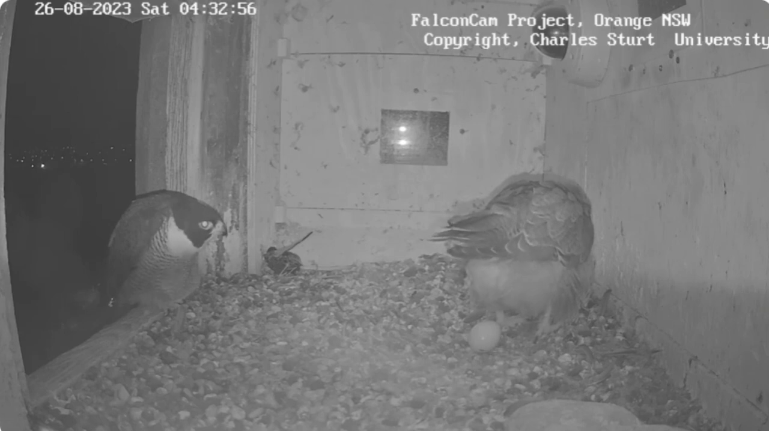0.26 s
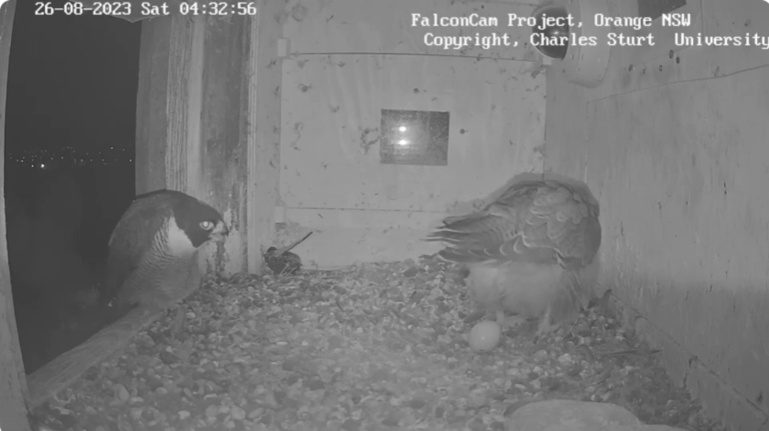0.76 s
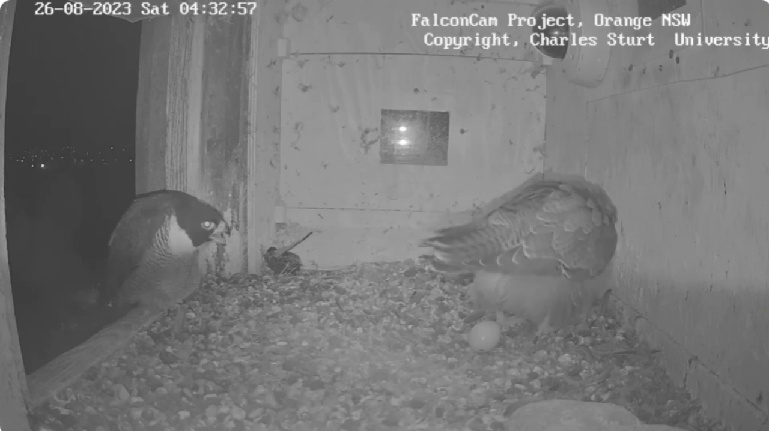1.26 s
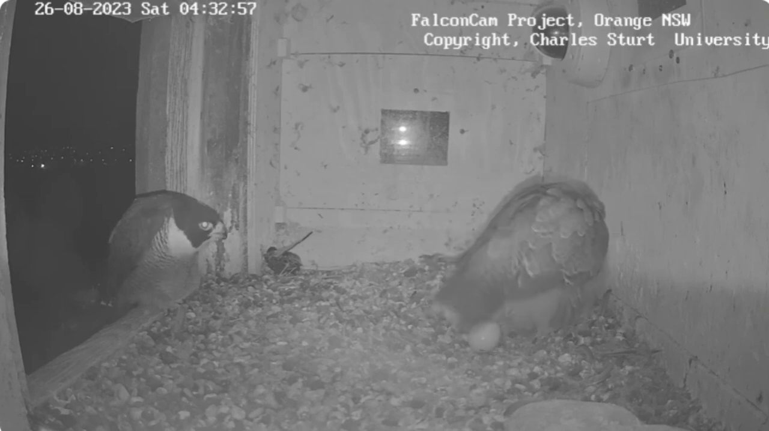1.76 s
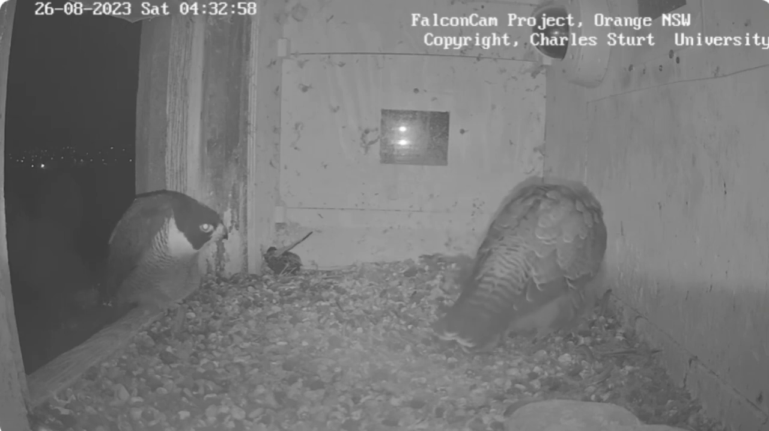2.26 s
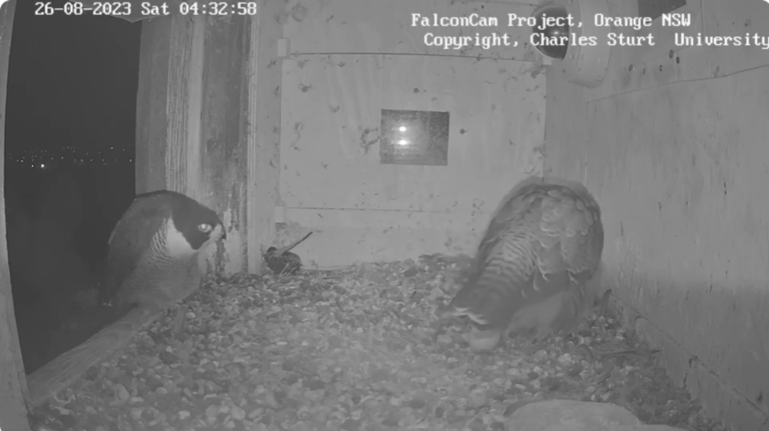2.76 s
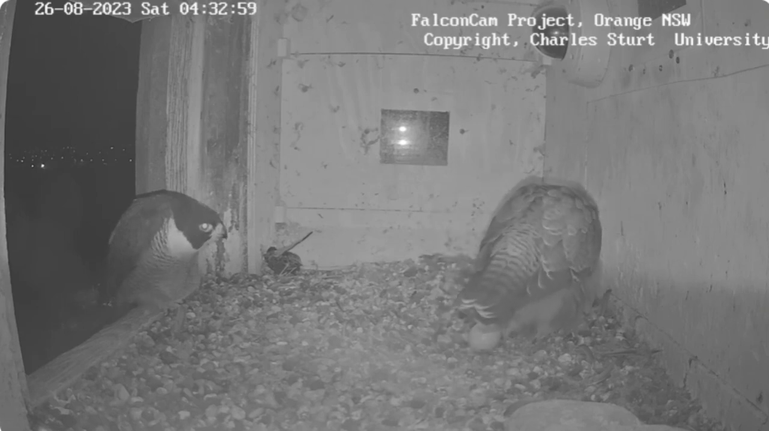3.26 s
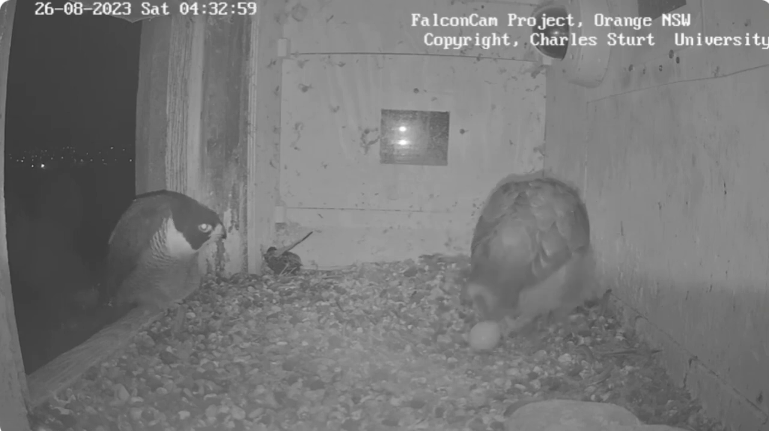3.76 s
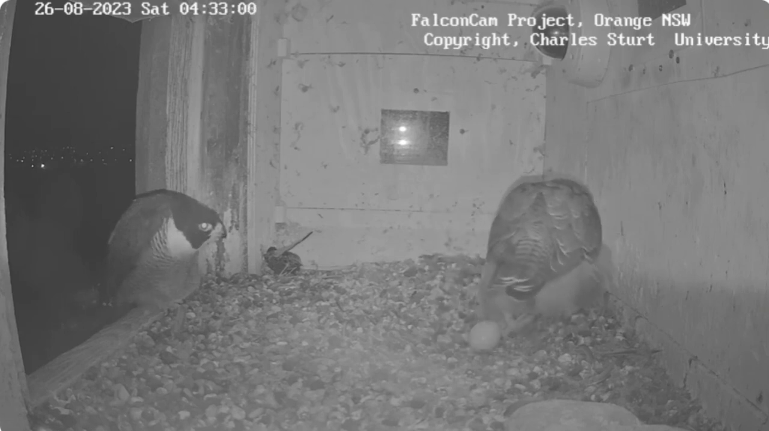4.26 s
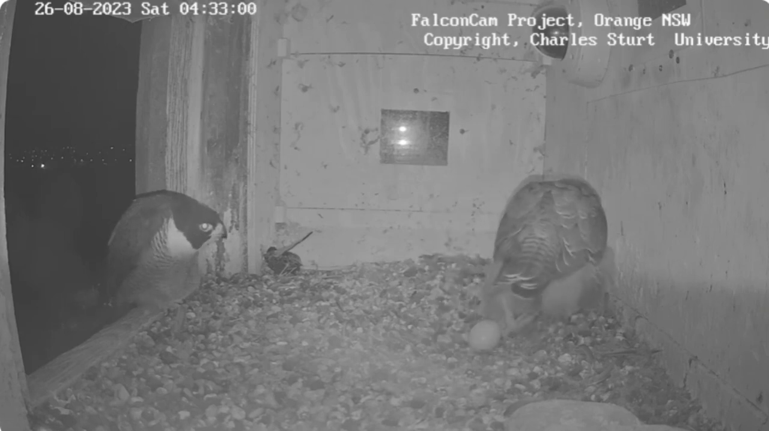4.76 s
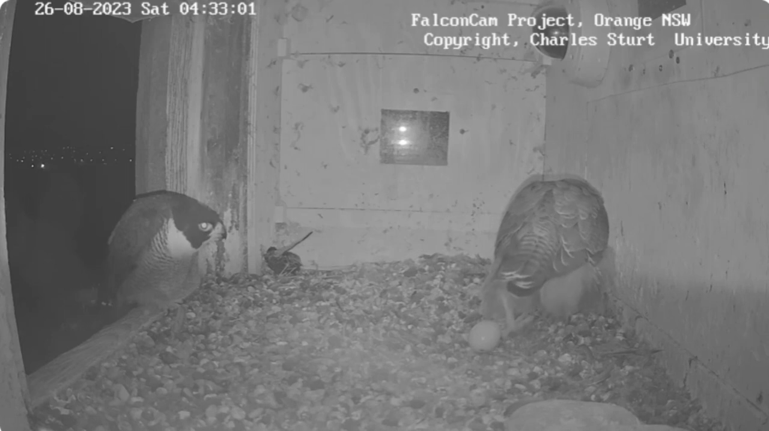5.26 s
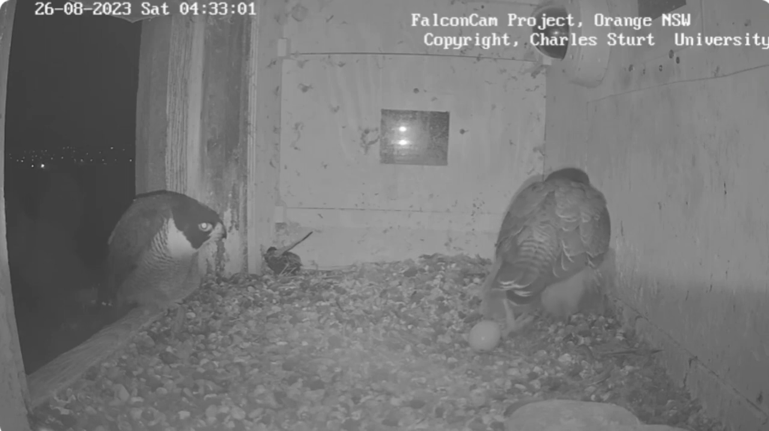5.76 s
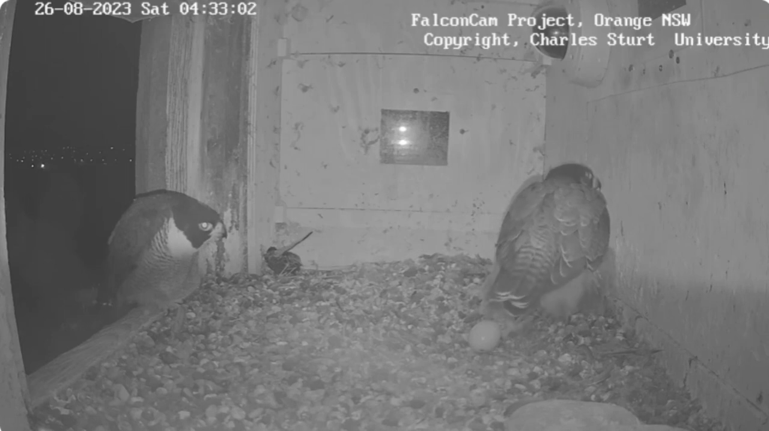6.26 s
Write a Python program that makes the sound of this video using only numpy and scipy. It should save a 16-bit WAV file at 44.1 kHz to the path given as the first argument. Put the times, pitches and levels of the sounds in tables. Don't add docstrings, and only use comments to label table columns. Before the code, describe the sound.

A falcon in a hollow, ringing nest box gives thin rising whistles snapping into chips, with throaty clucks and one hoarse answering call over low hum.

```python
import sys
import numpy as np
from scipy import signal
from scipy.fft import rfft, irfft
from scipy.io import wavfile

SR = 44100
rng = np.random.default_rng(int(sys.argv[2]) if len(sys.argv) > 2 else 0)


def convert_level_to_amplitude(level_db):
    exponent = np.asarray(level_db, float) / 20
    return 10 ** exponent


def wav_out(sig):
    wavfile.write(sys.argv[1], SR, np.round(np.clip(np.atleast_2d(sig).T, -1, 1) * 32767).astype(np.int16))


N = 287532
LEAD_IN = SR // 2

# pitch_hz, level_db
MAINS = [(50, -53.3), (100, -79), (150, -81), (200, -80), (300, -83)]
# freq_hz, density_db_per_hz
HISS = [(47, -27), (80, -1.5), (133, -4.5), (173, -6), (236, -6), (374, -15.5), (510, -9), (741, -19),
        (904, -18), (2600, -25.5), (2780, -21.5), (3110, -25), (15500, -32.5)]
HISS_DB, RUMBLE_DB = -67, -67
# time_s, level_db
WHINE = [(0, -97), (3.6, -93), (4.35, -81), (5, -86), (5.5, -82), (5.8, -91), (6.5, -90)]
WHINE_HZ = 2869
# start_s, scratch_db, thud_over_scratch_db, dullness_0_1
TICKS = [
    (.301, -52, -20, .1),
    (2.787, -68, 11, .87),
    (4.2, -68, 10, .87),
    (5.452, -48.5, -5, .9),
]
# time_s, level_db, pitch_hz
CROON = [(.085, -66, 281), (.135, -47.5, 276), (.225, -64, 268), (.305, -49, 287), (.37, -56, 282),
         (.62, -55, 277), (.682, -69, 275), (.72, -57, 284), (.95, -66, 283)]
CROON_FLUTTER_DB, CROON_RASP_DB = 2.8, -11
# start_s, pulse_rate_hz, level_db, mouth_factor, brightness_db
CLUCKS = [
    (.064, 1652, -55.5, 1.69, 1),
    (0.078, 275.3, -52, 0.602, -25.5),
    (0.761, 338.2, -48.5, 1.08, -6),
    (1.196, 365, -46.5, 1.09, -12),
    (2.021, 366.4, -45.5, 1.1, -4),
    (2.832, 454.7, -39.5, 0.89, -1.5),
    (3.409, 400, -76, 0.95, -19),
    (4.55, 366, -49.5, 1.26, -3),
    (6.365, 307.7, -59.5, 0.95, -8),
]
CLUCK_SNAPS, SHORTEST_S = 7.4, .016
# freq_hz, width_hz, level_db
GAPE = [(978.6, 850, -4.5), (1462, 530, 0), (2216, 460, -8)]
# freq_hz, level_db
THROAT_ANSWER = [(1300, -26), (2700, -0.5), (4100, 1.5), (5400, -4), (6700, -12), (8000, -24), (9400, -22),
                 (10800, -32), (13500, -43)]
# freq_hz, width_hz, level_db
BREATH_ANSWER = [(629.6, 960, -2.5), (1680, 520, 2), (2300, 540, 7), (3420, 1200, -13), (4810, 940, 2)]
# time_s, pitch_hz, effort_db, even_partials_db, odd_partials_db
ANSWER = [
    (2.853, 1336, -42, -19, -10),
    (2.858, 1364, -38.5, -15.5, -7),
    (2.872, 1340, -40, -29, -12),
    (2.882, 1356, -36.5, -1.5, -4.5),
    (2.891, 1266, -36.5, 3, -30),
    (2.897, 1345, -50, 9.5, -8.5),
    (2.914, 1405, -52.5, 10, 9),
    (2.924, 1380, -69, -0.5, -5),
]
# time_s, pitch_hz, level_db
UNDERTONE = [(2.853, 1250, -53), (2.859, 1240, -44), (2.872, 1222, -42.5), (2.881, 1200, -43),
             (2.887, 1130, -58.5)]
# start_s, length_s, pitch_hz, level_db, octave_db
PEEPS = [(1.95, .018, 5410, -76, -6), (1.966, .02, 5420, -78, 11), (3.352, .022, 5460, -76, 5),
         (4.5, .03, 5420, -73, -8), (6.311, .013, 5410, -73, -16)]
# freq_hz, level_db
THROAT = [(900, -10.5), (1200, 6), (2100, -4), (3200, -5.5), (4300, -0.5), (5300, -7.5), (6400, -5.5),
          (7000, -9.5), (7500, -20), (8300, -9.5), (9000, -12.5), (10800, -24.5), (13500, -22)]
# freq_hz, width_hz, level_db
BREATH = [(1250, 390, 0), (2411, 92, 15.5), (3240, 170, -19), (5500, 240, -12.5)]
# start_s, top_pitch_hz, effort_db, even_partials_db, effort_change_before_break_db
WHISTLES = [
    (-.15, 1088, -46.5, -18, -11),
    (.697, 1093, -49, -19, -2.5),
    (1.145, 1113, -52.5, -32, 5.5),
    (1.954, 1131, -50, -10, 5),
    (3.343, 1115, -49, -12.5, 2.3),
    (4.494, 1141, -49.5, -14, 4),
    (6.321, 1065, -52.5, -30, -3),
]
# break_s, first_pitch_hz, last_pitch_hz, effort_db, odd_partials_db
CHIPS = [
    (-.1, 1299, 972, -46.5, -12),
    (.746, 1119, 964, -46, -16.5),
    (1.18, 1149, 1012, -44.5, -7),
    (2.004, 1153, 1014, -44, -13.5),
    (3.397, 1093, 991, -48, -2),
    (4.54, 1077, 1017, -50, 5.5),
    (6.357, 1057, 969, -49.5, -1),
]
WHISTLE_FROM, WHISTLE_BEND = .88, 1.833
CATCH_AT, FULL_AT = .15, .6
ONSET_DB, CATCH_DB = .5, -6.5
WHISTLE_ODD_DB = -33
BREAK_S, CHIP_S, CHIP_SAG_S, RELEASE_S = .00407, .018, .01, .0053
CHIP_MID_DB, CHIP_END_DB, RELEASE_DB = -1.5, -2.5, -6.5
CHIP_EVEN_DB, CHIP_EVEN_END_DB, CHIP_ODD_END_DB = .6, 7.5, -5.5
ROUGH = dict(jitter=.008, shimmer_db=3, rasp=.33)
# freq_hz, t60_s
TOWER = [(250, 3.4), (500, 3.72), (1050, 2.22), (1500, 2.01), (2000, 1.76), (4000, 1.165), (6500, 0.911),
         (9000, 0.53), (13000, 0.21)]
# freq_hz, level_db
TOWER_COLOUR = [(250, 8.5), (700, -4.5), (1500, -4.5), (2200, 3.5), (4500, 1), (9000, 0.5), (13000, -0.5)]
BOX_DB, BOX_T60_S, WALL_HZ = -3, .07, 10000
# freq_hz, level_db
BALANCE_DB = [(60, 0.0), (92, 0.0), (140, 0.0), (210, 0.0), (330, 0.0), (500, 0.5), (770, 3.0), (1170, 4.0),
              (1790, 2.0), (2740, 0.5), (4190, 0.0), (6410, 0.0), (9810, 0.0), (15000, 0.0)]
# freq_hz, phase_rad
LEAD = [(150, 0), (330, .08), (700, .28), (1200, .15), (2400, -.28), (4800, -.08), (9000, -.06)]
EDGE_HZ, CHANNEL_NOISE_DB = 15720, -93


def evened(x):
    return x / np.sqrt(np.mean(x ** 2) + 1e-20)


def read(points, hz):
    f, value = np.transpose(points)
    return np.interp(np.log(hz + 1), np.log(f + 1), value)


def unroll(rows):
    s, *columns = np.transpose(rows)
    times = np.arange(s[0], s[-1], 1 / SR)
    return s[0], [np.interp(times, s, column) for column in columns]


def add(track, s, sound):
    part = track[LEAD_IN + round(s * SR):][:len(sound)]
    part += sound[:len(part)]


def wobble(count, span):
    return evened(signal.fftconvolve(rng.standard_normal(count), np.hanning(2 * int(span)), "same"))


def dull(x, hz):
    return signal.sosfilt(signal.butter(4, hz, fs=SR, output="sos"), x)


def resonate(x, modes, factor=1):
    out = np.zeros(len(x))
    for k, (hz, width_hz, db) in enumerate(modes):
        b, a = signal.iirpeak(hz * factor, hz * factor / width_hz, SR)
        twice = signal.lfilter(b, a, signal.lfilter(b, a, x))
        out += (-1) ** k * convert_level_to_amplitude(db) * twice
    return out


def tone(s, hz, db, overtones_db):
    turns = np.cumsum(hz * (1 + .0063 * wobble(len(hz), 200))) / SR
    voice = sum(convert_level_to_amplitude(o) * np.sin(2 * np.pi * (k + 1) * turns) for k, o in enumerate(overtones_db))
    return s, np.sqrt(2) * convert_level_to_amplitude(db) * voice * signal.windows.tukey(len(hz), .04)


def hum():
    t, hz = np.arange(N) / SR, np.fft.rfftfreq(N, 1 / SR)
    lines = sum(np.sqrt(2) * convert_level_to_amplitude(db) * np.sin(2 * np.pi * (f * t + rng.random())) for f, db in MAINS)
    hiss = evened(irfft(rfft(rng.standard_normal(N)) * convert_level_to_amplitude(read(HISS, hz)), N))
    rumble = evened(resonate(rng.standard_normal(N), [(57, 14, -3), (30.2, 20, -10)]))
    return lines * convert_level_to_amplitude(.6 * wobble(N, 4000)) + convert_level_to_amplitude(HISS_DB) * hiss + convert_level_to_amplitude(RUMBLE_DB) * rumble


def whine():
    s, (db,) = unroll(WHINE)
    return s, np.sqrt(2) * convert_level_to_amplitude(db) * np.sin(2 * np.pi * WHINE_HZ * np.arange(len(db)) / SR)


def tick(s, db, thud_db, dullness):
    t = np.arange(1500) / SR
    scratch = signal.lfilter([.3], [1, -dullness], rng.standard_normal(len(t))) * np.exp(-t / .004)
    thud = np.sin(2 * np.pi * 110 * t) * np.exp(-t / .017)
    return s, convert_level_to_amplitude(db) * (scratch + convert_level_to_amplitude(thud_db) * thud)


def croon():
    s, (db, hz) = unroll(CROON)
    _, voice = tone(s, hz, db + CROON_FLUTTER_DB * wobble(len(hz), 520), [0, -30])
    rasp = evened(resonate(rng.standard_normal(len(hz)), [(285, 58, -4), (177, 55, -8)]))
    return s, voice + convert_level_to_amplitude(db + CROON_RASP_DB) * rasp


def cluck(s, hz, db, mouth, bright_db):
    count = round(max(CLUCK_SNAPS / hz, SHORTEST_S) * SR)
    turns = np.cumsum(hz * (np.linspace(.8, 1.19, count) + .18 * wobble(count, 60))) / SR
    snaps = np.diff(np.floor(turns - 1e-3), prepend=-1) * convert_level_to_amplitude(2.76 * rng.standard_normal(count))
    snaps += .014 * rng.standard_normal(count)
    drive = np.pad(snaps * signal.windows.tukey(count, .45), (0, 300))
    sound = resonate(drive, [(.93 * hz, 230, -8), (1.68 * hz, 330, -8)])
    sound += resonate(drive, GAPE, mouth)
    sound += convert_level_to_amplitude(bright_db) * resonate(drive, [(3190, 490, -3.5), (4890, 1000, -18.5)])
    return s, convert_level_to_amplitude(db) * evened(dull(sound, WALL_HZ))


def undertone():
    s, (hz, db) = unroll(UNDERTONE)
    return tone(s, hz, db, [0, -16, -12])


def peep(s, length_s, hz, db, octave_db):
    swell = signal.windows.tukey(round(length_s * SR), .5)
    s, sound = tone(s, np.full(len(swell), hz), db, [0, octave_db])
    return s, sound * swell


def phrase(whistle, chip):
    start_s, top_hz, effort_db, even_db, brink_db = whistle
    break_s, first_hz, last_hz, chip_db, odd_db = chip
    share = np.array([0, CATCH_AT, FULL_AT, 1])
    after_s = np.array([0, CHIP_S / 2, CHIP_S, CHIP_S + RELEASE_S])
    s = np.r_[start_s + share * (break_s - BREAK_S - start_s), break_s + after_s]
    rise_hz = top_hz * (1 - (1 - WHISTLE_FROM) * (1 - share) ** WHISTLE_BEND)
    sag = np.exp(-after_s / CHIP_SAG_S)
    fall_hz = last_hz + (first_hz - last_hz) * (sag - sag[-1]) / (1 - sag[-1])
    effort = np.r_[effort_db + np.array([ONSET_DB, CATCH_DB, 0, brink_db]),
                   chip_db + np.array([0, CHIP_MID_DB, CHIP_END_DB, RELEASE_DB])]
    even = np.repeat([even_db, CHIP_EVEN_DB, CHIP_EVEN_END_DB], repeats=[4, 2, 2])
    odd = np.repeat([WHISTLE_ODD_DB, odd_db, odd_db + CHIP_ODD_END_DB], repeats=[4, 2, 2])
    return np.transpose([s, np.r_[rise_hz, fall_hz], effort, even, odd])


def call(rows, throat, breath, breath_db, jitter, shimmer_db, rasp):
    s, (hz, effort_db, even_db, odd_db) = unroll(rows)
    count = len(hz)
    turns = np.cumsum(hz * (1 + jitter * wobble(count, 83))) / SR
    broken = np.clip(convert_level_to_amplitude(even_db), .55, 1)
    slack = (effort_db - effort_db.max()) / 20
    air = resonate(rng.standard_normal(count), breath)
    voice = convert_level_to_amplitude(breath_db) * evened(dull(air, WALL_HZ))
    for k in range(1, 13):
        share_db = odd_db if k % 2 else even_db if k % 4 else 0
        share_db = share_db + .7 * max(k - 4, 0) * slack - 1.6 * max(k - 6, 0) * broken
        share_db = share_db + shimmer_db * wobble(count, 75)
        slip_rad = rasp * broken * np.sqrt(k / 4) * wobble(count, 30)
        partial = np.cos(2 * np.pi * (k * turns + rng.random()) + slip_rad)
        voice += np.sqrt(2) * convert_level_to_amplitude(read(throat, k * hz) + share_db) * partial
    return s, convert_level_to_amplitude(effort_db) * voice * signal.windows.tukey(count, .08)


def space(x, tower_db):
    t = np.arange(3 * SR) / SR
    hz, at_s, z = signal.stft(rng.standard_normal(len(t)), SR, nperseg=256)
    z = z * convert_level_to_amplitude(read(TOWER_COLOUR, hz)[:, None] - 60 * at_s / read(TOWER, hz)[:, None])
    tail = signal.istft(z, SR, nperseg=256)[1][:len(t)] * (1 - np.exp(-t / .015))
    box = dull(rng.standard_normal(len(t)), WALL_HZ) * convert_level_to_amplitude(-60 * t / BOX_T60_S) * (t > .0015)
    response = convert_level_to_amplitude(tower_db) * tail / np.linalg.norm(tail) + convert_level_to_amplitude(BOX_DB) * box / np.linalg.norm(box)
    response[0] += 1
    return signal.fftconvolve(x, response)[LEAD_IN:LEAD_IN + N]


def scene():
    near, throaty, mate, whistler = np.zeros((4, LEAD_IN + N))
    add(near, *whine())
    for row in TICKS:
        add(near, *tick(*row))
    add(near, *croon())
    for row in CLUCKS:
        add(throaty, *cluck(*row))
    add(mate, *undertone())
    add(mate, *call(ANSWER, THROAT_ANSWER, BREATH_ANSWER, breath_db=-6.5, **ROUGH))
    for row in PEEPS:
        add(whistler, *peep(*row))
    for whistle, chip in zip(WHISTLES, CHIPS):
        add(whistler, *call(phrase(whistle, chip), THROAT, BREATH, breath_db=-14, **ROUGH))
    mono = hum() + near[LEAD_IN:] + space(throaty, tower_db=-.68)
    mono += space(mate, tower_db=-1.5) + space(whistler, tower_db=2.5)
    return np.array([mono, mono])


def band_limit(x):
    return signal.sosfilt(signal.butter(12, 15680, fs=SR, output="sos"), x)


def record(dry):
    hz = np.fft.rfftfreq(N, 1 / SR)
    half = convert_level_to_amplitude(read(BALANCE_DB, hz) / 2) * np.exp(.5j * read(LEAD, hz))
    pair = irfft(rfft(dry) * np.array([half, 1 / half]) * (hz < EDGE_HZ), N)
    pair += convert_level_to_amplitude(CHANNEL_NOISE_DB) * rng.standard_normal(N) * np.array([[1], [-1]])
    return band_limit(pair)


dry = scene()
out = record(dry)
wav_out(out)
```